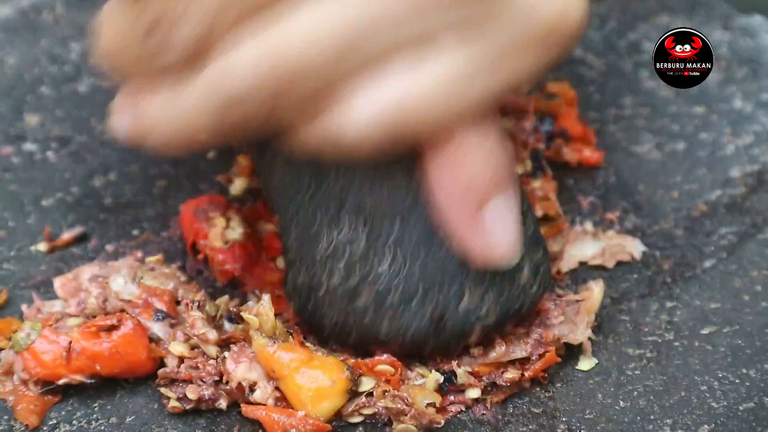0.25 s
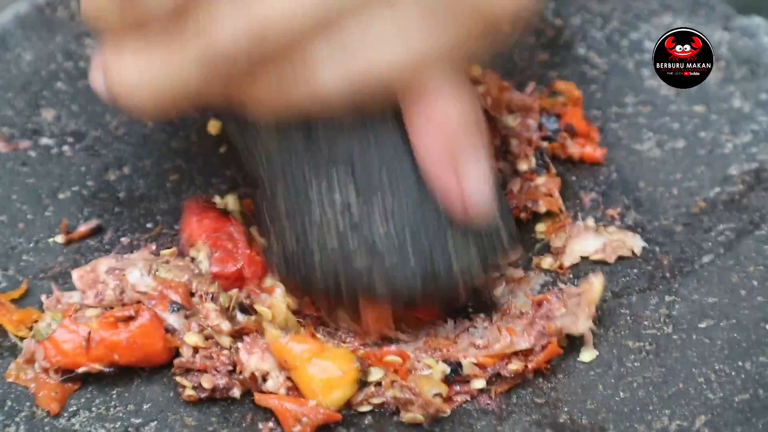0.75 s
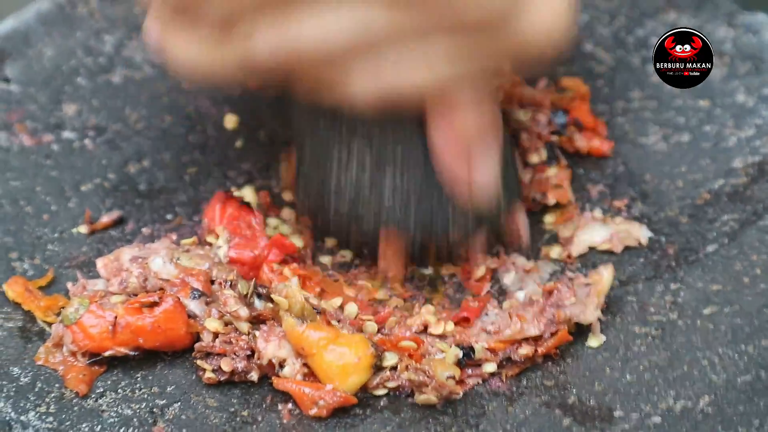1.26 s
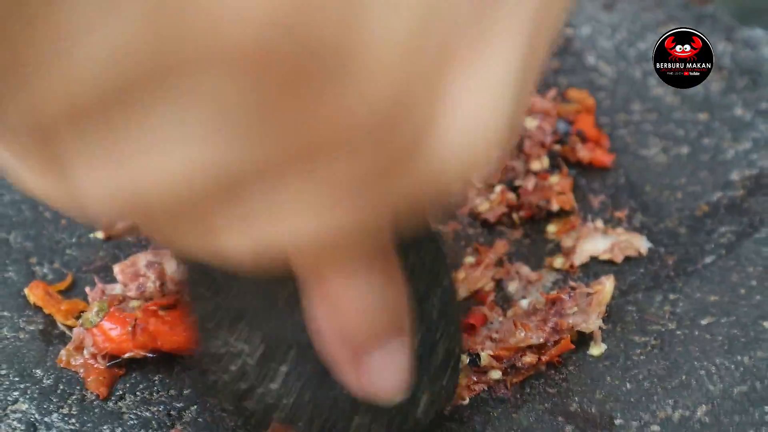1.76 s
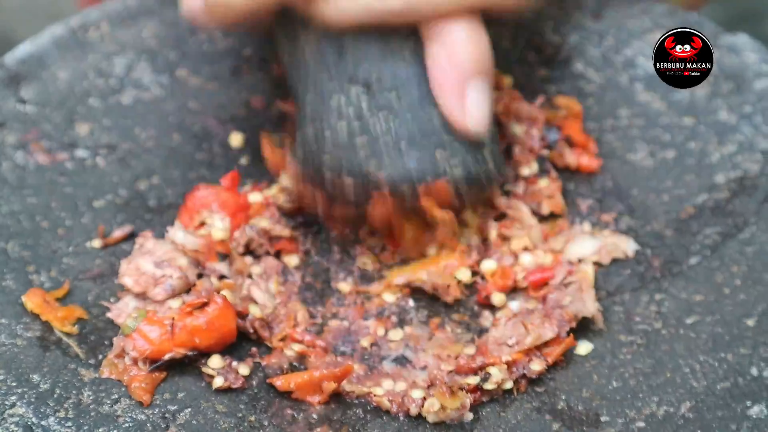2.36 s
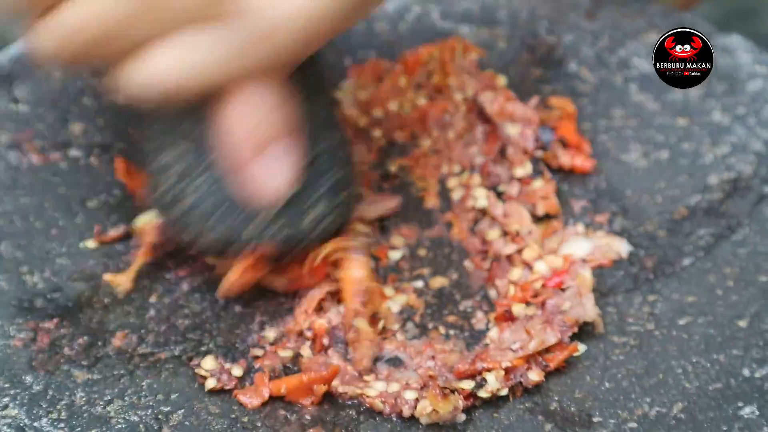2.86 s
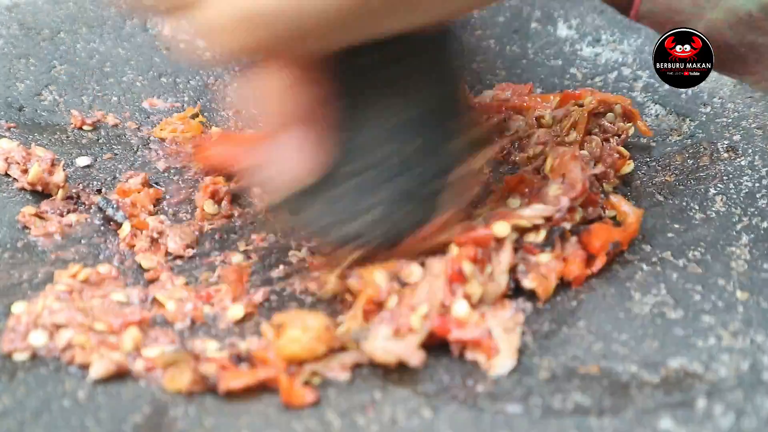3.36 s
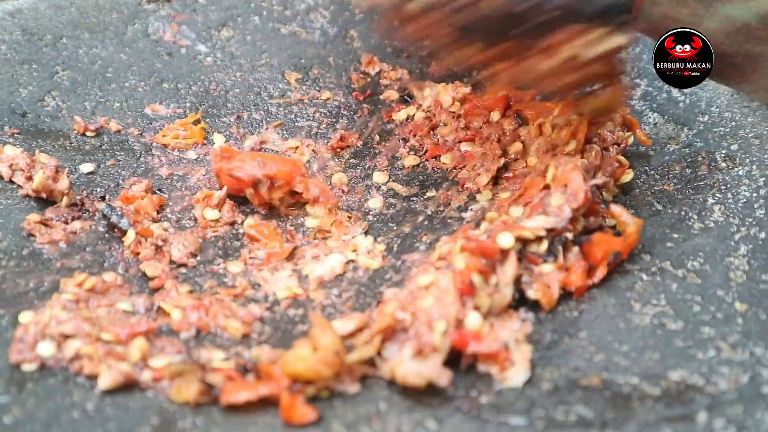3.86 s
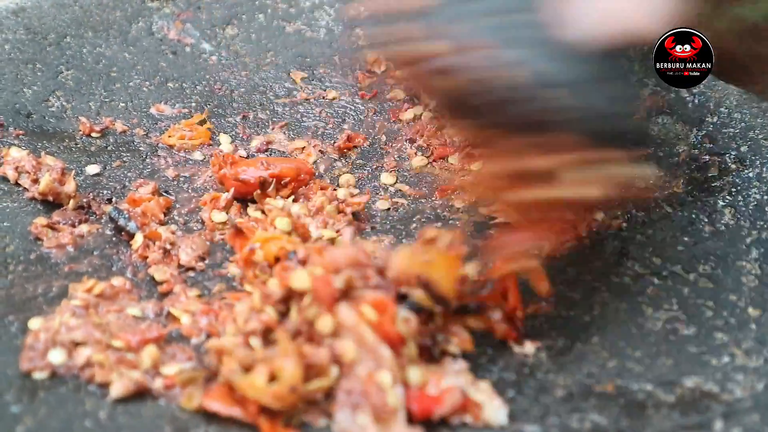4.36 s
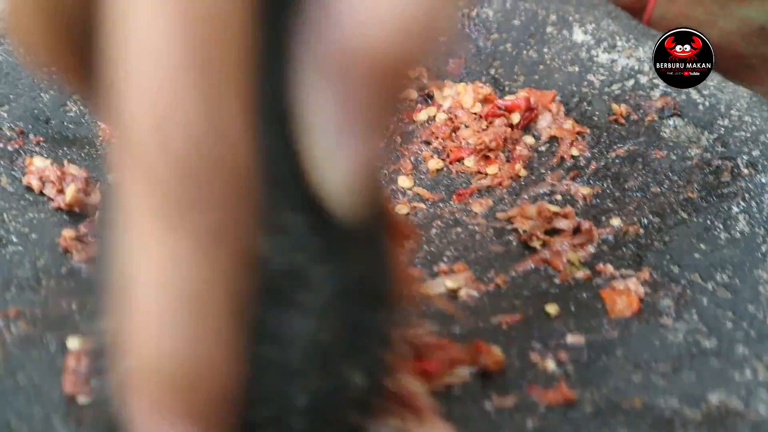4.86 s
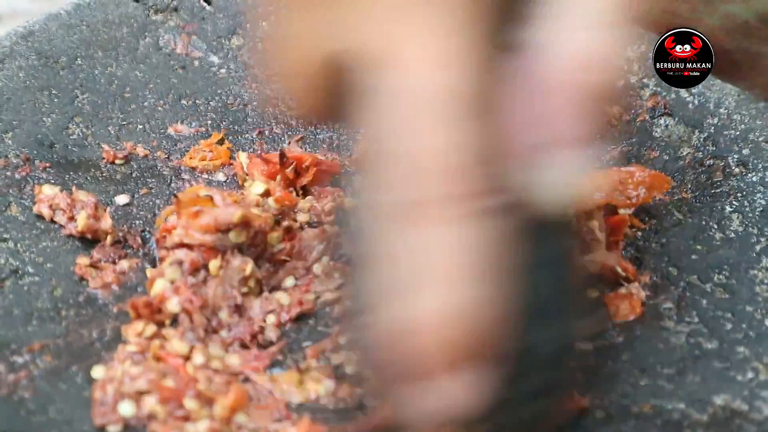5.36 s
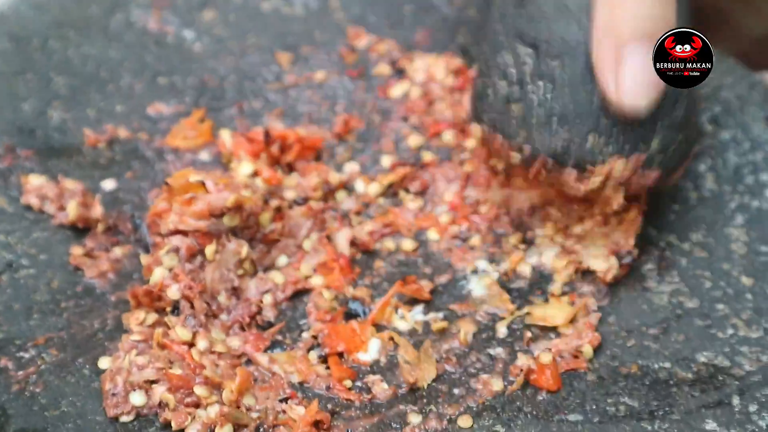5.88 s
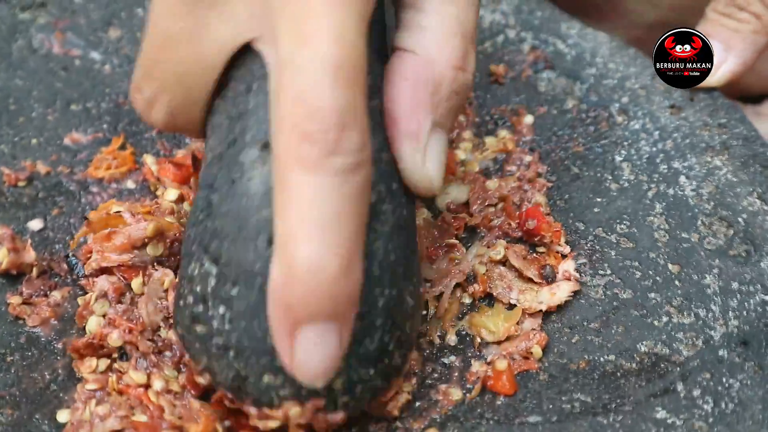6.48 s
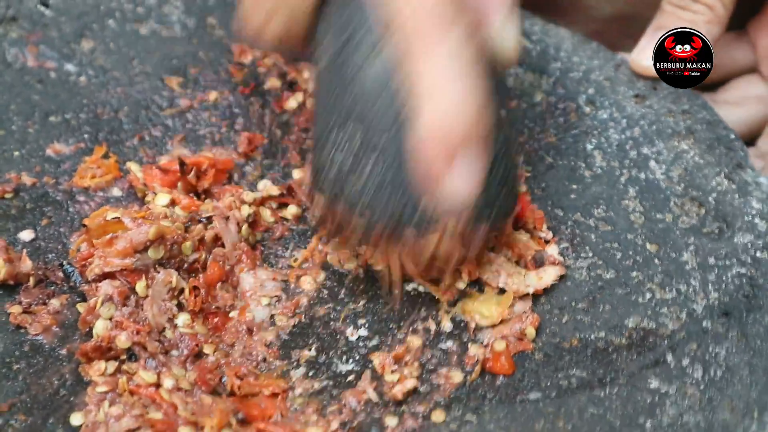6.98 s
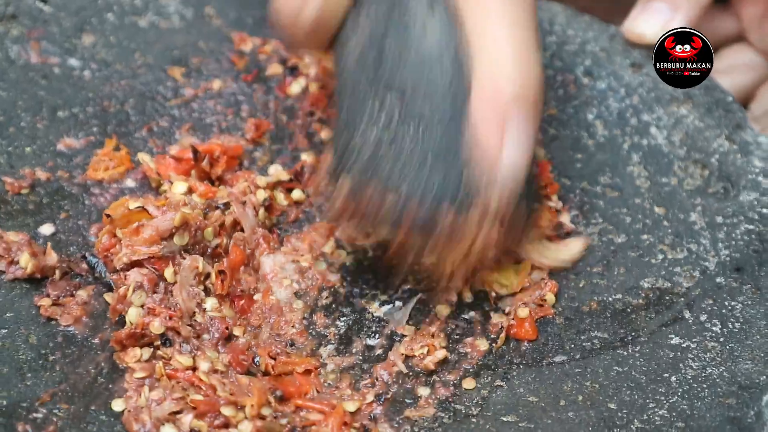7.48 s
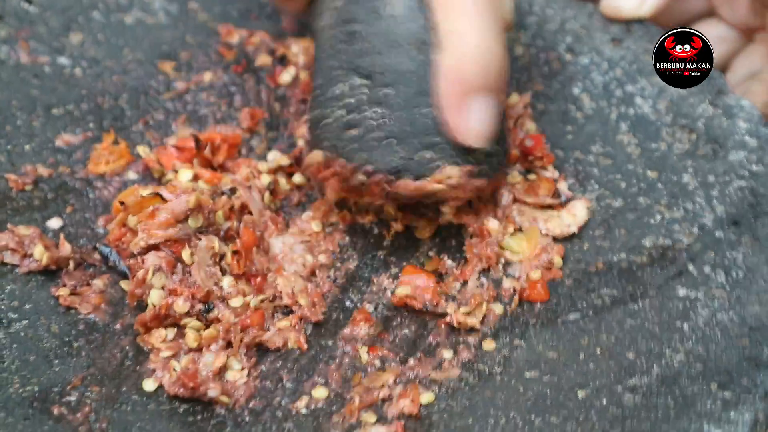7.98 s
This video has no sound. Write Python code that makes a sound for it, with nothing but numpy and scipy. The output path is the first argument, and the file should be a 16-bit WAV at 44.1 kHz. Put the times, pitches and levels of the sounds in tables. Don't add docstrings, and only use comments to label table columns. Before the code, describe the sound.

Very close to a stone slab outdoors, a stone pestle crushes wet spices. Light, short gritty rubs come first, with a very hard ringing knock early on and another before three seconds. Then the grinding suddenly grows much louder: long hissing sweeps, wet snaps and low slab rumble, followed by quick even mashing strokes with cracking seeds. A faint hum of air and distant machines lies behind.

```python
import sys
import numpy as np
from scipy import signal
from scipy.fft import rfft, irfft, next_fast_len
from scipy.io import wavfile
from scipy.ndimage import uniform_filter1d

SR = 44100
rng = np.random.default_rng(int(sys.argv[2]) if len(sys.argv) > 2 else 0)


def invert_db(level):
    return 10 ** (np.asarray(level, dtype=float) / 20)


def transcribe(signal):
    frames = np.atleast_2d(signal).T
    limited = np.clip(frames, -1, 1)
    pcm = np.round(limited * 32767).astype(np.int16)
    wavfile.write(sys.argv[1], SR, pcm)


N = 362924
CONTROL_STEP = 32

# frequency in Hz, width in Hz, level in dB.
SLAB_MODES = [(243.6, 82, -12), (317, 40.6, -1), (424.5, 56, -3), (469, 13.3, 6), (567.5, 55, -6)]
GRIND_MODES = [(720, 72, -3.5), (931, 130, -2), (1077, 193, 1.5), (1285, 735, -6.5)]
LOW_RING_MODES = [(1858, 44, 3.5), (1911, 80, -1), (4070, 60, -18)]
HIGH_RING_MODES = [(3228, 69, 3), (3342, 80, 3.5)]
SQUEAK_MODES = [(6120, 120, -2.5), (6300, 160, -2.5)]
# frequency in Hz, level in dB per Hz.
PASTE_SPECTRUM = [(350, -42.5), (600, -16.5), (1360, -18.5), (1890, -10.5), (2120, -16.5), (3480, -2.5),
                  (5660, -3), (15100, -12), (16400, -29)]
# time in seconds, level in dB.
HUM_LEVEL = [(0, -54.5), (.6, -55), (.66, -69.5), (1.8, -70.5), (2.701, -61), (2.99, -67), (3.02, -50.5),
             (3.9, -50.5), (4.5, -49.5), (4.95, -48.5), (5.8, -60), (5.86, -60), (6.0, -50), (8.23, -52)]
GAP_S = (2.99, 2.9985)


def unit(x):
    return x / np.sqrt(np.mean(x ** 2))


def ring(x, hz, width):
    radius = np.exp(-np.pi * width / SR)
    angle = 2 * np.pi * hz / SR
    return signal.lfilter([0.5, 0, -0.5], [1, -2 * radius * np.cos(angle), radius * radius], x)


def band(x, hz, width):
    return ring(ring(x, hz, width), hz, width) * np.pi * width / SR * 2


def body(x, modes):
    out = 0
    for k, (hz, width, db) in enumerate(modes):
        if db > -100:
            out = out + (-1) ** k * invert_db(db) * width / modes[0][1] * ring(x, hz, width)
    return out


def colour(x, points):
    hz, db = np.transpose(points)
    size = next_fast_len(N)
    bin_hz = np.arange(size // 2 + 1) * SR / size
    gain = invert_db(np.interp(np.log(bin_hz + 1), np.log(hz), db))
    return irfft(rfft(x, size) * gain / np.sqrt(np.mean(gain ** 2)), size)[:N]


def walk(rate):
    hold = int(SR / rate)
    steps = np.repeat(rng.standard_normal(N // hold + 1), hold)
    return unit(uniform_filter1d(steps, hold)[:N])


def curve(points):
    return np.interp(np.arange(N) / SR, *np.transpose(points))


def every_sample(x):
    return np.interp(np.arange(N), np.arange(0, N, CONTROL_STEP), x)


def bell(centre, rise_s, fall_s, edge_db, power):
    away = np.arange(0, N, CONTROL_STEP)[:, None] / SR - centre
    return invert_db(-edge_db * np.where(away < 0, -away / rise_s, away / fall_s) ** power)


def clicks(times, db):
    out = np.zeros(N)
    np.add.at(out, (np.asarray(times) * SR).astype(int), invert_db(db))
    return out


def burst(x, t60):
    t = np.arange(int(t60 * SR)) / SR
    return signal.fftconvolve(x, rng.standard_normal(len(t)) * invert_db(-60 * t / t60))[:N]


def grit(per_s, spread_db, smooth, patchy_db):
    when, size = rng.random(N), rng.exponential(size=N)
    sign, noise = rng.standard_normal(N), rng.standard_normal(N)
    snaps = unit((when < per_s / SR) * invert_db(np.minimum(spread_db * size, 11)) * sign)
    return unit((snaps + smooth * noise) * invert_db(patchy_db * (walk(45) + walk(140))))


def rub(db, modes, force, shift_db=1.5):
    push = force * invert_db(db)
    silent_first = modes[0][:2] + (-200,)
    out = 0
    for k, mode in enumerate(modes):
        favoured = push * invert_db(shift_db * np.tanh(walk(9)))
        out = out + (-1) ** k * body(favoured, [silent_first, mode])
    return out / np.linalg.norm(body(signal.unit_impulse(SR // 4), modes))


def add_db(a, b):
    return 10 * np.log10(invert_db(2 * a) + invert_db(2 * b))


def strokes():
    # time in seconds, high ring in dB, low ring in dB.
    grip = [(0, 2, -1), (1.2, 6.5, 1), (2.6, 5.5, -2.5), (3.1, -1, 0), (5.1, -1.5, 1.5), (5.5, 2.5, 1.5),
            (6.7, 0.5, -5.5), (8.2, 3, 0)]
    # frequency in Hz, width in Hz, level in dB.
    song_modes = [(470.4, 20, 0.5), (485, 45, -4)]
    hiss, slab, grind, low = effort()
    high_flare, squeak_flare, song = flares()
    s, loose_high, loose_low = np.transpose(grip)
    free_high, free_low = curve([s, loose_high][:0] or np.transpose([s, loose_high])), curve(np.transpose([s, loose_low]))
    coarse = grit(per_s=900, spread_db=3.5, smooth=0.6, patchy_db=1.3)
    fine = grit(per_s=3500, spread_db=6.5, smooth=0.83, patchy_db=4.5)
    cushion = signal.butter(2, 4600, fs=SR)
    force = unit(signal.lfilter(*cushion, coarse + 0.45 * fine))

    sizes = [fine + 0.99 * grit(per_s=300, spread_db=3.0, smooth=1.0, patchy_db=2.5) for _ in range(3)]
    patches = np.zeros(N)
    for k, hz in enumerate(1250 * 1.48 ** np.arange(7)):
        patches += band(sizes[k % 3] * invert_db(3 * walk(14)), hz, 0.6 * hz)
    out = colour(unit(patches), PASTE_SPECTRUM) * invert_db(hiss + 3.5)

    out += rub(slab - 0.6, SLAB_MODES, coarse)
    out += rub(grind - 2.2, GRIND_MODES, force)
    out += rub(low - 1.2 + free_low, LOW_RING_MODES, force)
    high = add_db(0.56 * hiss + 0.6 * grind + free_high - 3, high_flare - 2.5)
    out += rub(high, HIGH_RING_MODES, force)
    squeak = add_db(0.35 * hiss + 0.85 * grind - 11, squeak_flare - 0.6)
    out += rub(squeak, SQUEAK_MODES, fine)
    out -= rub(song - 6, song_modes, coarse)
    rumble = unit(ring(coarse, 75, 86) + 0.53 * ring(fine, 140, 50))
    return out + rumble * invert_db(-32.5 + 0.73 * slab)


def effort():
    # centre in
    # seconds, length in seconds, paste hiss in dB, slab rumble and grind in dB re hiss.
    stroke_rows = [(0.052, 0.31, -41.5, 5, -4), (0.25, 0.19, -37, 6, 1), (0.786, 0.15, -51, 3.5, 2),
                   (0.983, 0.16, -55.5, 0, -10), (1.169, 0.18, -50.5, 2.5, -1.5), (1.368, 0.2, -54, 3, -6.5),
                   (1.552, 0.14, -50, 5, -1.5), (1.935, 0.16, -43.5, 1.5, -8.5), (2.107, 0.19, -45, 2, -5),
                   (2.314, 0.19, -44, 3.5, -4.5), (2.479, 0.21, -42.5, 4.3, -1.5), (2.904, 0.1, -50.5, 8.5, 4),
                   (2.965, 0.091, -59.5, 8, -6),
                   (3.079, 0.34, -37, 12, 1.5), (3.231, 0.18, -30, 9, -3), (3.452, 0.16, -33.5, 5.5, -15),
                (3.649, 0.2, -33, 8, -5), (4.246, 0.26, -30, -9.5, -20), (4.664, 0.23, -34.5, -5.5, -21),
                (5.086, 0.24, -30, 5, -10), (5.282, 0.22, -32, 5, -4.5), (5.457, 0.21, -38, 9.5, 4.5),
                (5.665, 0.18, -35.5, 2, -4), (5.783, 0.065, -45, 12, -3.5), (5.86, 0.16, -66.5, 23, 9.5),
                   (6.134, 0.19, -32, 0.28, -6.5), (6.299, 0.17, -32.5, 6.9, -8),
               (6.488, 0.13, -29.5, 0.2, -6.5), (6.681, 0.18, -35.5, 2.5, -3.5),
               (6.858, 0.18, -32.5, 2.8, -3), (7.041, 0.2, -33.5, 7.7, -4.5), (7.234, 0.15, -30, 10.5, 0),
               (7.407, 0.17, -32.5, 8, 3.5), (7.615, 0.23, -33, 7.1, 1.5), (7.954, 0.24, -36.5, 5, -2.5),
               (8.172, 0.15, -39, 6.7, 0.6)]
    # time in seconds, then hiss, slab, grind and low ring in dB.
    landings = [(.002, -67, -26, -39, -47), (0.624, -66, -29, -26, -20), (1.308, -50.5, -48.5, -50.5, -64),
                (1.852, -46.5, -23, -40.5, -33.5), (2.268, -51, -22, -46, -45), (2.808, -80, -31, -27, -28),
                (3.006, -42, -16, -30, -19.5), (3.028, -60, -19, -30, -24), (4.129, -41, -40, -61, -36),
                (4.58, -37, -22, -54, -42), (4.984, -31, -14, -30, -48), (5.995, -32.5, -28.5, -43, -26.5),
                (7.876, -51, -14, -40, -23)]
    # centre and length in seconds, slab, grind and low ring in dB.
    bites = [(5.7, 0.043, -48, -53, -38), (3.14, 0.11, -33, -40, -28), (0.259, 0.043, -35, -28, -29.5),
             (0.695, 0.16, -35, -35, -32.5), (2.9, 0.19, -35.5, -40, -35), (.86, .1, -75, -75, -57),
             (3.068, 0.085, -18.5, -33, -14), (3.213, 0.06, -21, -23, -14.5),
             (5.018, 0.053, -9, -26.5, -36), (5.45, 0.062, -13, -14, -18.5),
             (5.642, 0.055, -11.5, -17.5, -19), (5.68, 0.07, -13.5, -31.5, -37.5),
             (5.884, 0.076, -32, -51, -54), (6.28, 0.072, -22, -22.5, -28), (6.839, 0.11, -30, -26, -32),
             (7.366, 0.046, -19, -9.5, -34), (5.474, .045, -20, -16, -18), (3.233, .025, -17, -20, -24),
             (7.25, .05, -24, -30, -40), (6.68, 0.06, -16, -48, -58), (7.052, 0.02, -27, -25.5, -48),
             (6.531, 0.11, -22, -42.5, -58), (0.9, .04, -40, -58, -62), (7.6, 0.036, -25, -32, -30),
             (7.907, 0.053, -31, -21, -13), (8.007, 0.036, -21, -35, -53)]
    # hiss, slab, grind and low ring in dB re hum.
    resting = (-23, -5.5, -11, -19)

    s, span, hiss, slab, grind = np.transpose(stroke_rows)
    half, lead_s, edge_db = span / 2, 0.015, 21
    slide = bell(s, half / 1.146, half * 1.146, edge_db, 2.19)
    press = bell(s - lead_s, span / 2.48, span / 1.66, edge_db, 2.15)
    boom = bell(s - lead_s / 2, half / 1.233, half * 1.233, 17.5, 2.16)
    t = np.arange(0, N, CONTROL_STEP) / SR
    same_side = (t[:, None] < GAP_S[1]) == (s < GAP_S[1])
    slide, press, boom = slide * same_side, press * same_side, boom * same_side
    stroke_power = [
        slide ** 2 @ invert_db(2 * hiss),
        boom ** 2 @ invert_db(2 * (hiss + slab)),
        press ** 2 @ invert_db(2 * (hiss + grind)),
        press ** 2 @ invert_db(2 * (hiss + grind - 6.5)),
    ]
    s, *land_db = np.transpose(landings)
    down = bell(s, 0.008, 0.094, 47, 0.85)
    s, span, *bite_db = np.transpose(bites)
    bite_db = [bite_db[1] - 24] + bite_db
    bit = bell(s, span / 2, span / 1.84, 32.0, 1.52)
    rest = np.interp(t, *np.transpose(HUM_LEVEL))
    levels = []
    for power, land, bite, murmur in zip(stroke_power, land_db, bite_db, resting):
        total = power + down ** 2 @ invert_db(2 * land) + bit ** 2 @ invert_db(2 * bite) + invert_db(2 * (rest + murmur))
        levels.append(every_sample(10 * np.log10(total)))
    return levels


def flares():
    # centre in seconds, length in seconds, high ring in dB, squeak in dB, slab song in dB.
    crossings = [(0.284, 0.037, -37, -60, -45), (0.358, 0.091, -62, -70, -41),
                 (3.075, 0.067, -43, -35, -35), (3.122, .04, -45, -50, -25), (3.25, 0.034, -26, -45, -27),
                 (3.423, 0.036, -29, -50, -42), (3.646, 0.18, -34.5, -55, -30),
                 (3.724, 0.11, -50, -61, -24), (5.466, 0.051, -26.5, -26.5, -35),
                 (5.505, .05, -47, -50, -22), (5.644, 0.035, -19, -31, -24),
                 (5.669, 0.025, -26.5, -45, -14.5), (5.708, 0.042, -38, -48, -22),
                 (5.755, .05, -41, -55, -32), (6.348, .05, -45, -55, -26), (6.495, 0.056, -27, -40, -31),
                 (6.558, 0.052, -56, -60, -28), (6.65, 0.1, -35, -38, -27), (6.686, 0.034, -42, -45, -19),
                 (6.848, 0.099, -28, -33, -25), (7.04, 0.077, -36, -39, -29), (7.24, .1, -26.5, -42, -22),
                 (7.295, 0.028, -31, -33, -28), (7.375, .05, -27, -28, -20), (7.441, .06, -33, -45, -22),
                 (7.592, 0.097, -39, -48, -25.5), (7.643, .04, -28, -30, -25),
                 (7.685, 0.057, -51, -50, -23.5), (7.913, 0.051, -34, -42, -27)]
    s, span, *levels = np.transpose(crossings)
    power = bell(s, span / 2.4, span / 1.7, 18, 1.6) ** 2
    return [every_sample(10 * np.log10(power @ invert_db(2 * db) + 1e-12)) for db in levels]


def cracks():
    # time in seconds, peak in dB, then grind, low ring and high ring in dB re peak.
    seeds = [(0.09, -21, 6.5, -17, -1), (0.2228, -17, -14, -15, 1), (0.2529, -12.5, 13, 5, 7.5),
             (1.5034, -39.5, 13.5, 8, -2), (3.1972, -4.5, -20, -3, -10), (3.2284, -9, -5, -5, 2),
             (3.4187, -20.5, 9, -8, 6.5), (3.5786, -19, -5, -5, -5.5), (5.221, -21.5, -17, 1, 5.5),
             (5.457, -17, 9, 0, 2), (5.7424, -18, 1.5, -1, -16), (5.9978, -18, -16, -3, -9),
             (6.2203, -26, -8, -3, 4.5), (6.4654, -8, -12, -30, -11), (6.4878, -2.5, 2, -30, 3),
             (6.838, -12.5, -6, -4, 5), (7.1083, -10.5, -25, -5, -18), (7.2937, -19, 21, 8, 0),
             (7.3696, -20, 18, 4, 7), (6.829, -29, 8, -10, -4), (7.6374, -17.5, 22, -16, 11),
             (7.665, -10.5, 5, 6, -20), (8.1446, -17, 6, -16, -0.5), (5.6664, -21, -10, -11, 14.5)]
    # time in seconds, peak in dB, then slab, grind and low ring in dB re peak.
    bumps = [(1.8515, -18, -2, -5, -15), (2.274, -24, -9.5, -18, -21.5), (2.9989, -24, 25, 7, 11),
             (3.044, -12, 3, -5, 2), (3.2284, -7, 5.5, 13, -6.5), (4.1297, -22, -12, -35, -2.5),
             (4.577, -8.5, -20, -19, -22.5), (4.9829, -10.5, -3, 3, 1.5), (5.1341, -18, 16, 16, 0),
             (5.3772, -23, -4, -18, 12), (5.4436, -16, 14.5, 15, 12), (5.626, -23, 0, -3, 18.5),
             (5.6462, -16, 17, -2, 3), (6.275, -15, 4, 15, -14), (7.1833, -16.5, 14, -11, -16),
             (8.1895, -19, 19.5, 8.5, -12)]
    # time in seconds, peak in dB, frequency in Hz, t60 in ms.
    wet_snaps = [(0.0814, -15, 10300, 10), (.297, -24, 8000, 14), (.835, -41, 6000, 9),
                 (1.1122, -54, 6080, 9.3), (1.444, -31.5, 3850, 11), (2.298, -25, 5100, 10),
                 (2.934, -36, 11500, 8), (3.116, -19, 3600, 12), (3.133, -18, 2600, 12),
                 (3.315, -23, 5200, 10), (3.324, -23, 5000, 8), (3.3765, -29, 6000, 8.7),
                 (3.4094, -17, 5800, 12), (3.453, -23, 5200, 22), (3.515, -20, 3960, 8),
                 (3.528, -18, 3400, 8), (3.6099, -9, 7000, 8.5), (3.785, -27.5, 5550, 42),
                 (4.188, -22, 3300, 10), (4.2344, -17, 3910, 10), (4.676, -28, 5640, 10),
                 (5.1228, -9, 4030, 11), (5.43, -23, 4300, 10), (5.5396, -19, 5000, 22),
                 (5.574, -24, 5300, 7.7), (5.588, -28, 5240, 8), (5.6872, -17, 4500, 10),
                 (5.7102, -17, 5110, 14), (5.788, -21.5, 4600, 19), (5.9756, -32, 5270, 10),
                 (6.445, -18.5, 4970, 10), (6.5847, -25, 5500, 10), (6.6391, -16, 4930, 9.1),
                 (6.658, -7.5, 4540, 9.4), (6.7275, -15.5, 5330, 13), (6.8042, -22, 3900, 10),
                 (6.9884, -26, 6070, 10), (7.4273, -17, 3600, 10), (7.5265, -22, 3600, 12),
                 (7.6247, -4.5, 4450, 8), (7.6909, -20, 5820, 10), (7.944, -7.5, 5230, 10),
                 (8.1167, -23, 3600, 10)]
    # time in seconds, peak in dB, frequency in Hz, t60 in ms.
    paste_drops = [
        (5.781, -22.5, 950, 16),
        (5.865, -28, 670, 18),
        (5.889, -23, 689, 18),
    ]

    seed_slab_db, bump_high_db = -12.5, -23
    rows = [(s, db, seed_slab_db, g, l, h) for s, db, g, l, h in seeds]
    rows += [tuple(bump) + (bump_high_db,) for bump in bumps]
    s, peak, slab, grind, low, high = np.transpose(rows)
    out = colour(burst(clicks(s, peak - 9), 0.0099), PASTE_SPECTRUM)
    give = np.hanning(9) / 4
    bodies = (
        (slab, SLAB_MODES, -14),
        (grind, GRIND_MODES, -17),
        (low, LOW_RING_MODES, -8),
        (high, HIGH_RING_MODES, -8),
        (grind, SQUEAK_MODES, -24),
    )
    for db, modes, trim_db in bodies:
        level = peak + db + trim_db
        kick = clicks(s, level - 1.5) - clicks(s + 0.0016, level - 8) + clicks(s + 0.0043, level - 11)
        if modes[0][0] < 2000:
            kick = np.convolve(kick, give)[:N]
        out += body(kick, modes)

    t = np.arange(SR // 25) / SR
    for s, db, hz, t60_ms in wet_snaps + paste_drops:
        noise = rng.standard_normal(len(t))
        shape = np.tanh(t / t60_ms * 14000) * invert_db(-60000 * t / t60_ms)
        start = int(s * SR)
        out[start:start + len(t)] += invert_db(db - 3.5) * band(noise * shape, hz, 300 + 0.76 * hz)
    return out


def knocks():
    # time in seconds, ring in dB, ring frequency in Hz, ring t60 in seconds, crack in dB.
    hits = [
        (0.6127, 23, 1850, 0.038, 5),
        (0.6304, 2.5, 1760, .011, -23),
        (2.7957, 12, 1850, 0.037, -3),
        (7.867, -26, 1843, 0.083, -44),
        (7.878, -15.5, 1790, 0.077, -37.5),
        (7.8867, -10, 1784, 0.09, -42),
        (7.907, -6.5, 1748, 0.038, -40),
    ]
    # frequency in Hz, width in Hz, level in dB.
    after_modes = [(1870, 19, -23.5), (4080, 14, -44), (1880, 6, -49), (660, 120, -21), (3230, 95, -17),
                   (446, 60, -19), (890, 83, -25), (6940, 410, -19.5)]
    s, ring_db, ring_hz, t60, crack_db = np.transpose(hits)
    out = colour(burst(clicks(s, crack_db), 0.015), PASTE_SPECTRUM)
    struck = clicks(s, ring_db)
    for hz, width, db in after_modes:
        out += invert_db(db) * ring(struck, hz, width)
    main = np.zeros(N)
    for start, db, hz, decay in zip(s, ring_db, ring_hz, t60):
        main += ring(clicks([start], db), hz, np.log(1000) / np.pi / decay)
    contact = np.hanning(12) / 6.0
    return out - 1.5 * np.convolve(main, contact)[:N]


def thuds():
    # time in seconds, stand in dB, stand frequency in Hz, slab in dB re stand.
    low_thumps = [(.613, -12.5, 108.9, 1.5), (1.852, -35.5, 122, -5), (3.002, -31, 82, 10.5),
                  (3.23, -32, 92.5, -1), (4.13, -30, 75.5, 3), (4.225, -30, 78, -10),
                  (4.649, -28, 80, -8), (4.58, -22.5, 80.5, 10.5), (4.987, -19.5, 92.5, 19),
                  (6.001, -33.5, 81.7, 7), (7.879, -28, 86.5, 19)]
    out, push = np.zeros(N), np.zeros(SR // 5)
    push[:SR // 500] = -np.hanning(SR // 500) * 1000 / SR
    for s, db, hz, slab_db in low_thumps:
        swing = ring(push, hz, 38) + invert_db(slab_db) * ring(push, 285, 99)
        start = int(s * SR)
        out[start:start + len(swing)] += invert_db(db) * swing
    return out


def hum():
    # frequency in Hz, level in dB per Hz.
    air_spectrum = [(15, -43), (25, -2.5), (124, -5.5), (280, -7), (348, -21), (377, -10.5), (925, -9.5),
                    (1120, -15.5), (2090, -19), (3590, -18), (6890, -28.5), (15100, -24.5), (16400, -54)]
    # time in seconds, level in dB.
    far_hiss_level = [(0, -68), (.6, -72), (.66, -79.5), (2.6, -71.5), (2.99, -77), (3.02, -58), (4.1, -55),
                      (4.95, -60), (5.8, -65), (6, -63), (8.23, -63)]
    # time in seconds, level in dB.
    whine_level = [(4.36, -110), (4.47, -54), (4.68, -54), (4.8, -110)]
    air = colour(rng.standard_normal(N), air_spectrum)
    air += invert_db(-6.0) * unit(ring(rng.standard_normal(N), 132, 21))
    far = unit(band(rng.standard_normal(N), 4000, 2200))
    far *= invert_db(curve(far_hiss_level) + 1.2 * walk(8))
    phase = 2 * np.pi * np.cumsum(1 + 0.0022 * walk(14)) / SR
    whine = 1.6 * np.sin(1100 * phase) + 0.8 * np.sin(1872 * phase)
    whine *= invert_db(curve(whine_level))
    return air * invert_db(curve(HUM_LEVEL) + 0.88 * walk(3.1)) + whine + far


def scene():
    mid = strokes() + cracks() + knocks() + thuds() + hum()
    start, end = (int(s * SR) for s in GAP_S)
    mid[start:end] *= invert_db(-62)
    low_side = 0.8 * ring(mid, 130, 110) / 30
    bright_side = 1.2 * np.diff(mid, prepend=0)
    side = invert_db(-33) * (1.15 * mid + low_side + bright_side) * walk(60)
    return np.array([mid + side, mid - side])


def roll_off(x):
    return signal.sosfilt(signal.butter(12, 16580, fs=SR, output="sos"), x)


def record(dry):
    top_cut = signal.ellip(6, 0.3, 40, 15900, fs=SR, output="sos")
    mix = np.clip(signal.sosfilt(top_cut, dry), -1.0, 1.0)
    return roll_off(mix)


dry = scene()
out = record(dry)
transcribe(out)
```